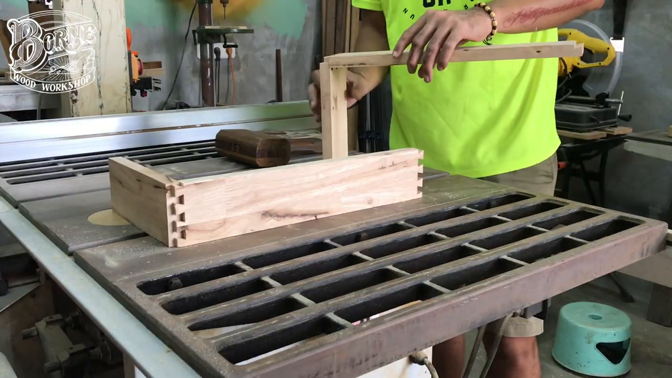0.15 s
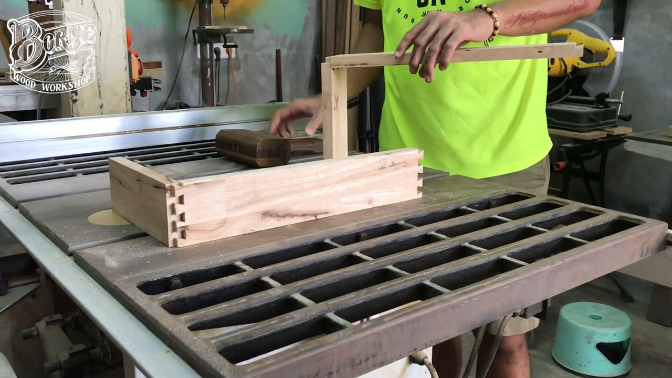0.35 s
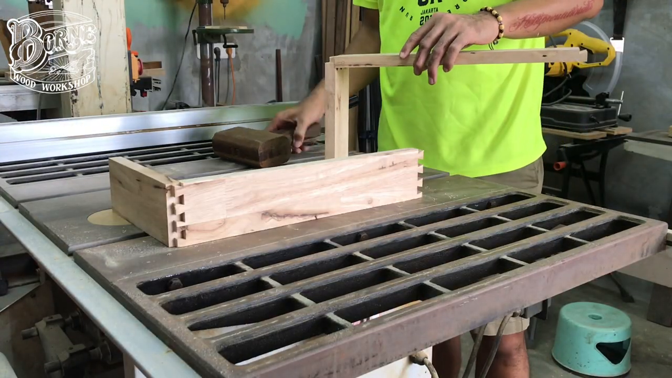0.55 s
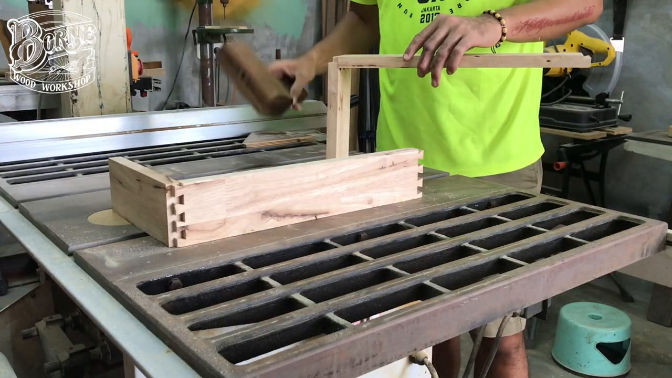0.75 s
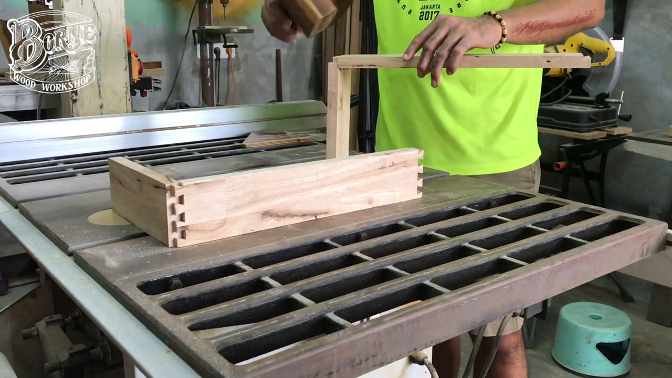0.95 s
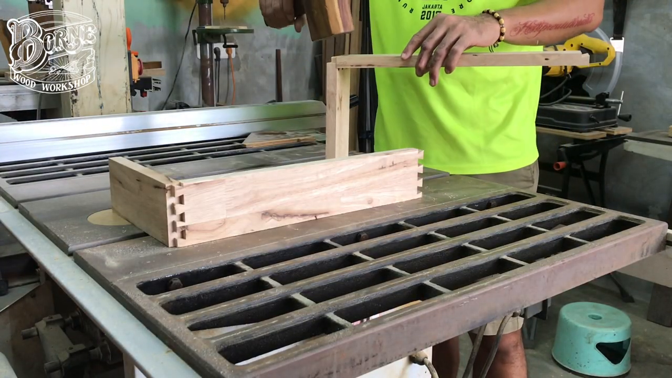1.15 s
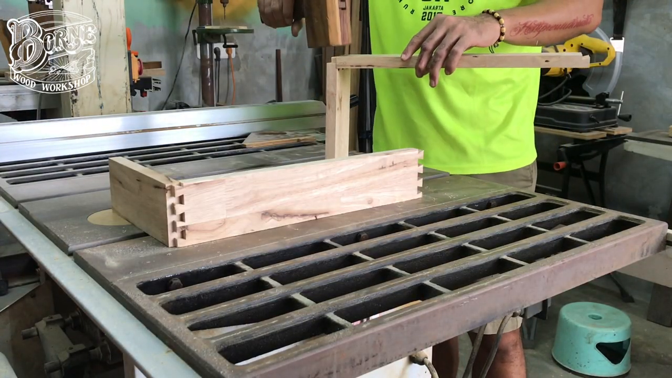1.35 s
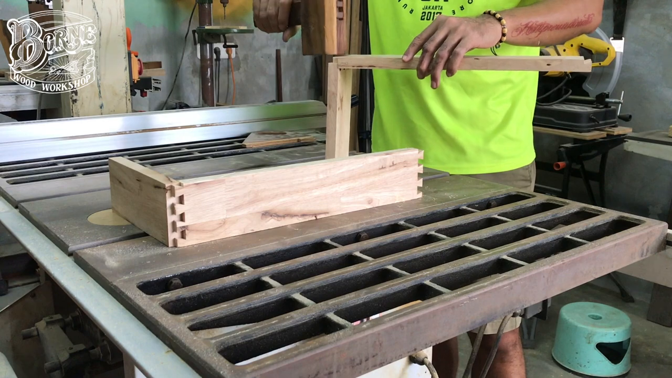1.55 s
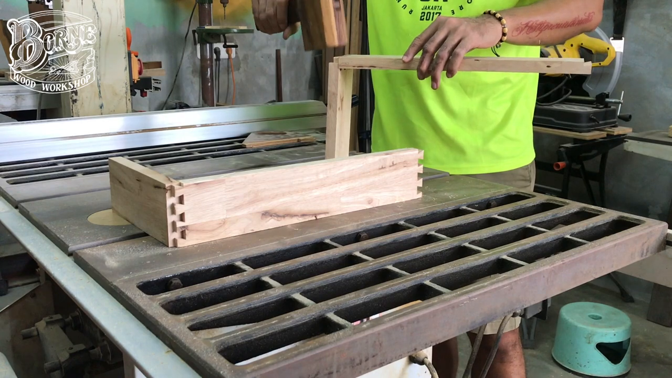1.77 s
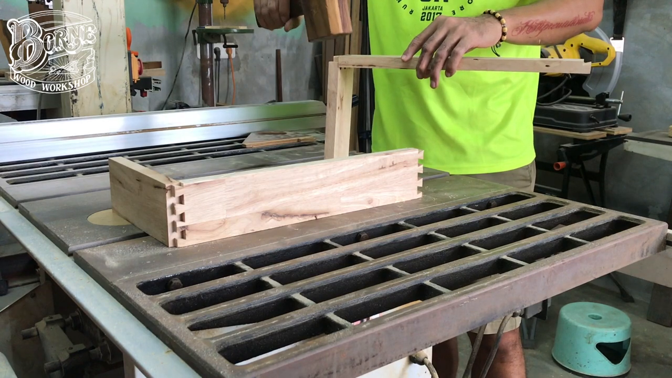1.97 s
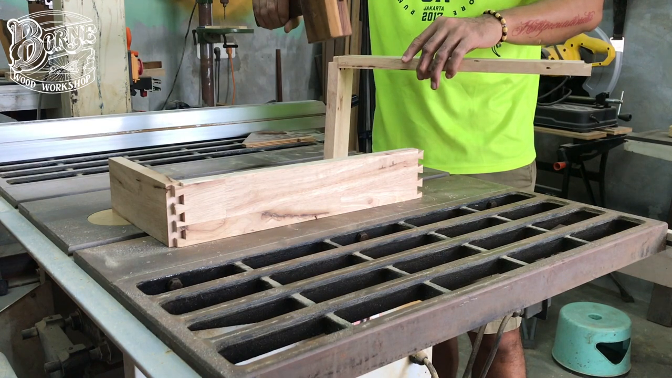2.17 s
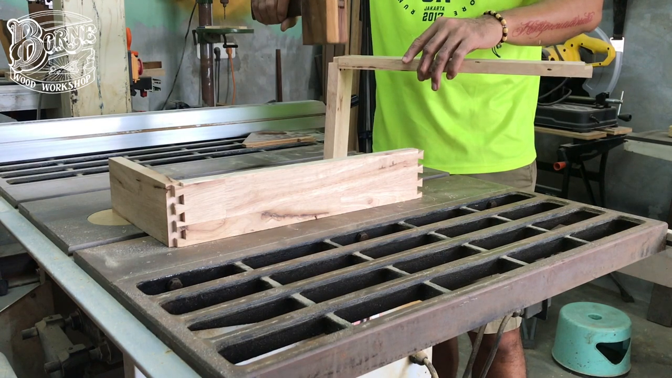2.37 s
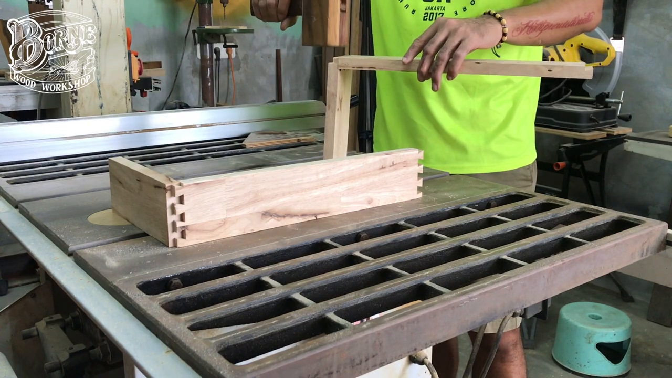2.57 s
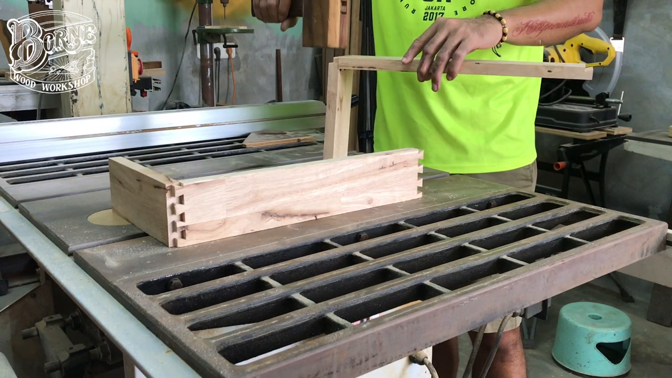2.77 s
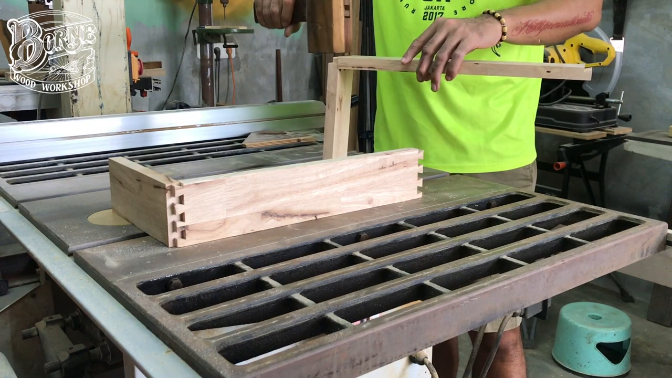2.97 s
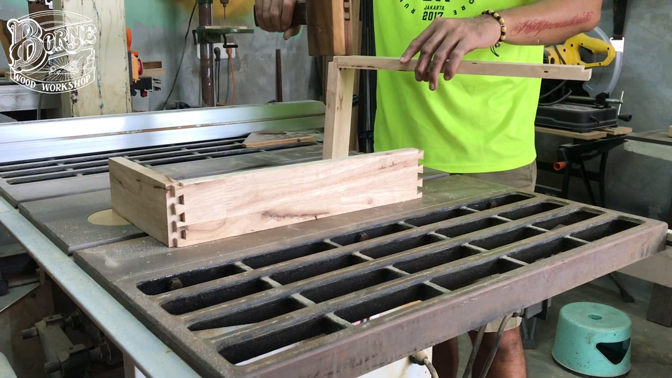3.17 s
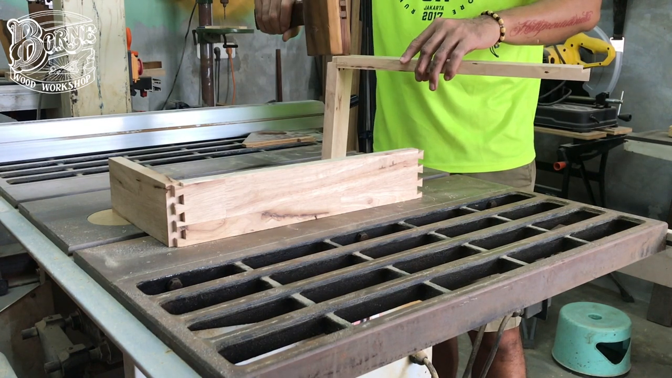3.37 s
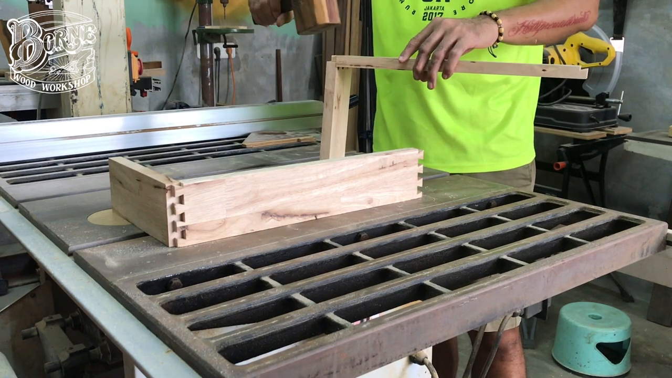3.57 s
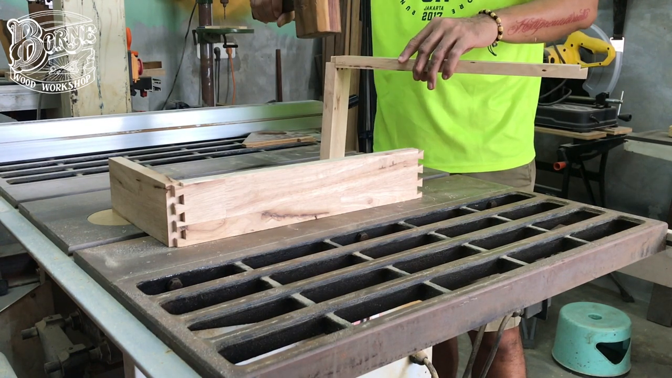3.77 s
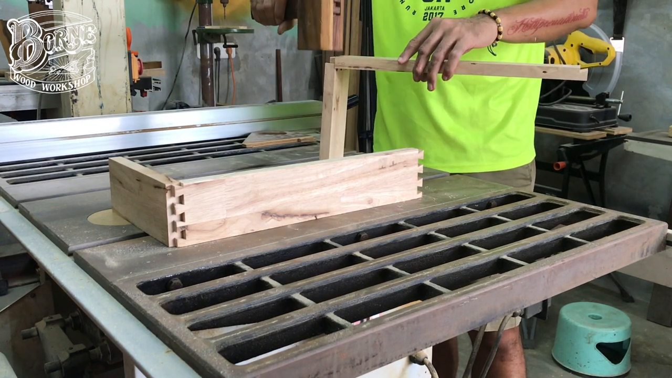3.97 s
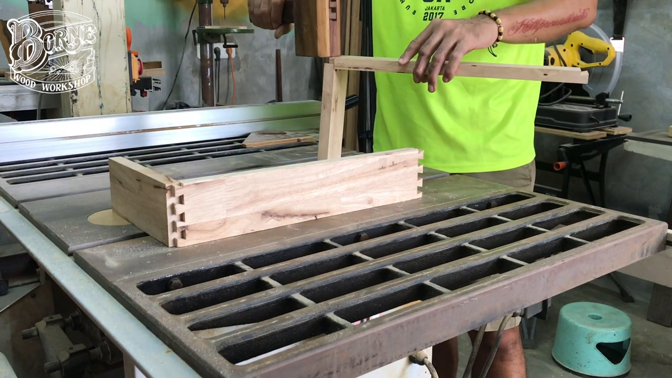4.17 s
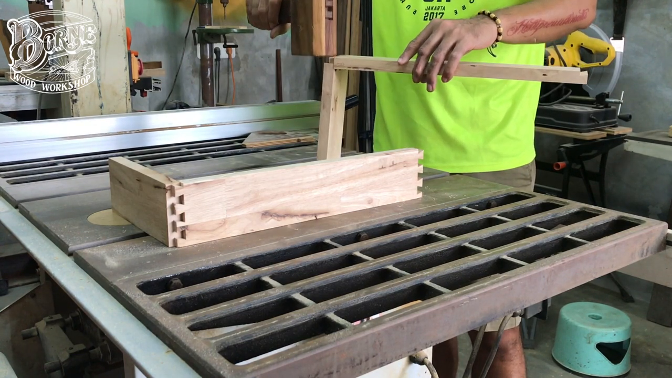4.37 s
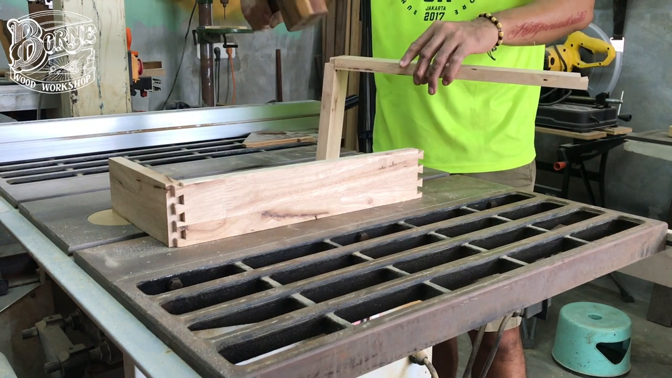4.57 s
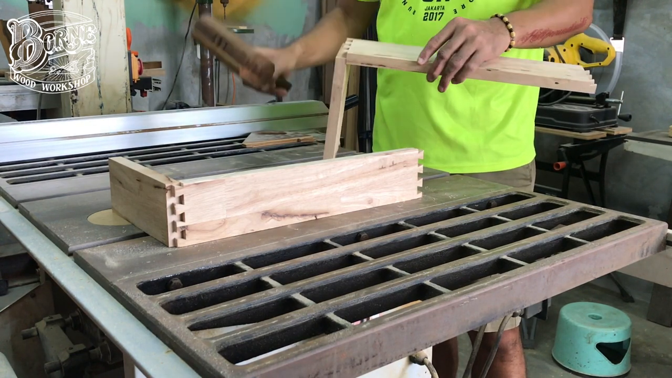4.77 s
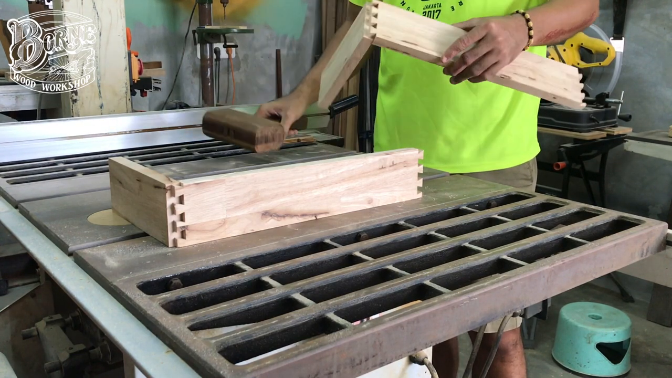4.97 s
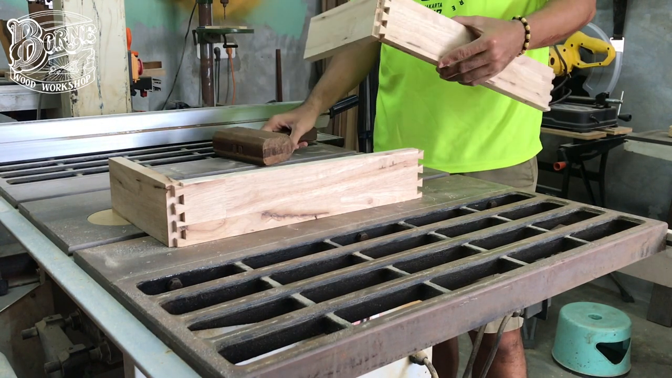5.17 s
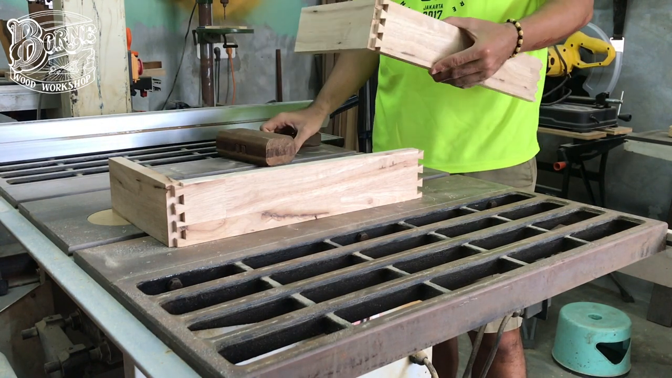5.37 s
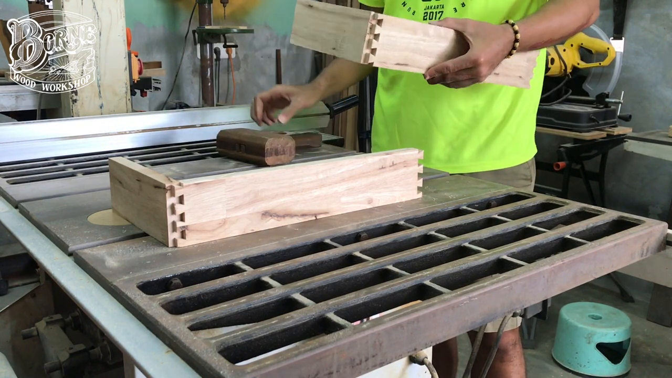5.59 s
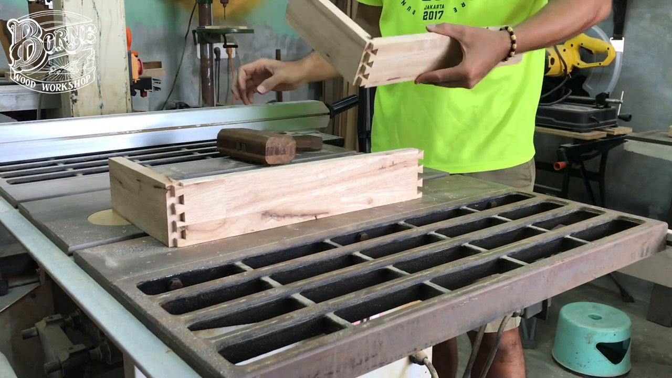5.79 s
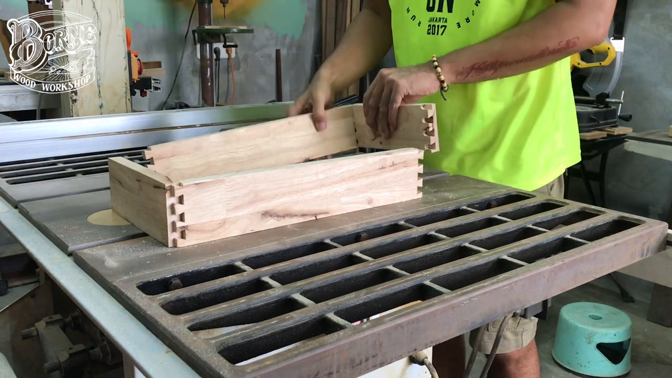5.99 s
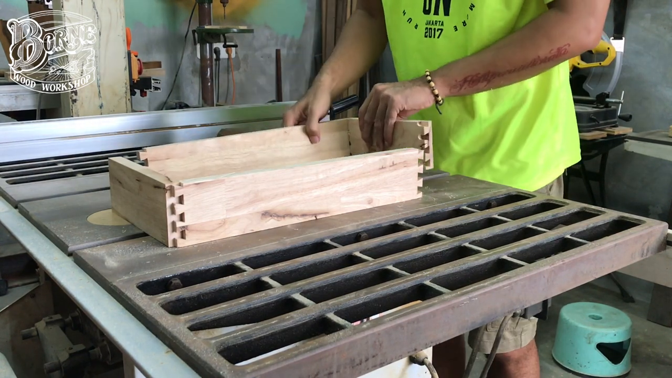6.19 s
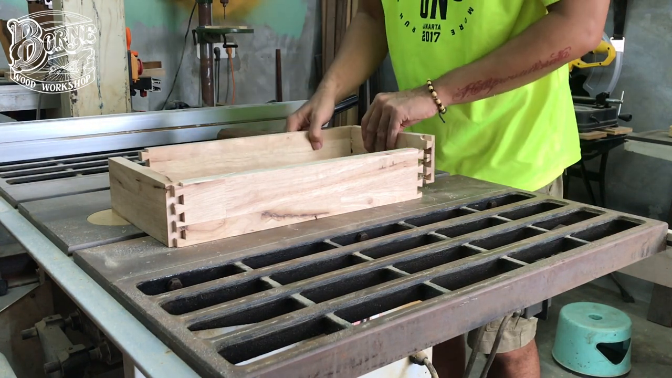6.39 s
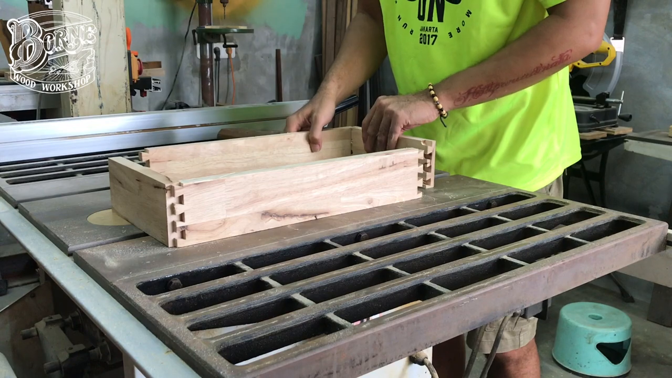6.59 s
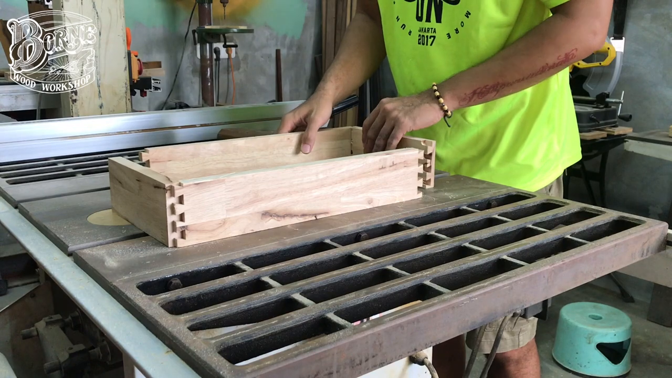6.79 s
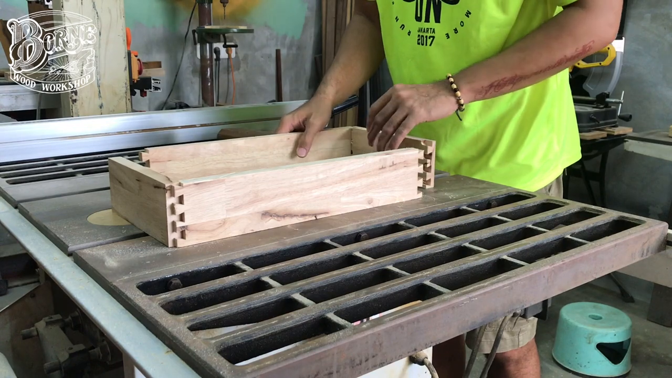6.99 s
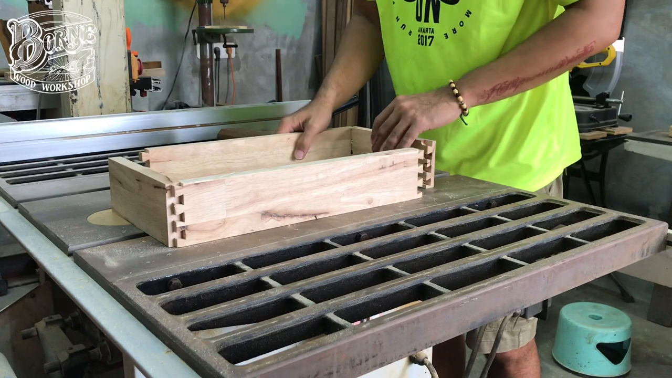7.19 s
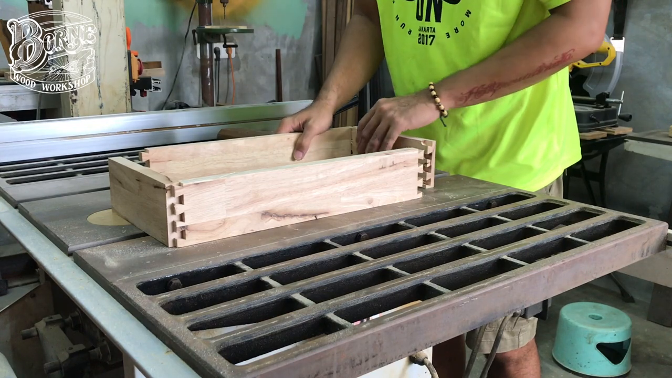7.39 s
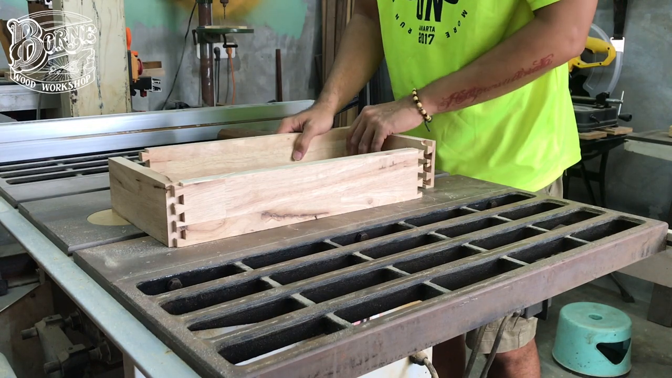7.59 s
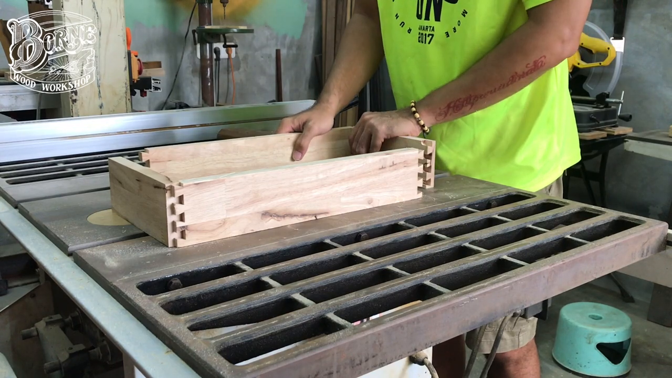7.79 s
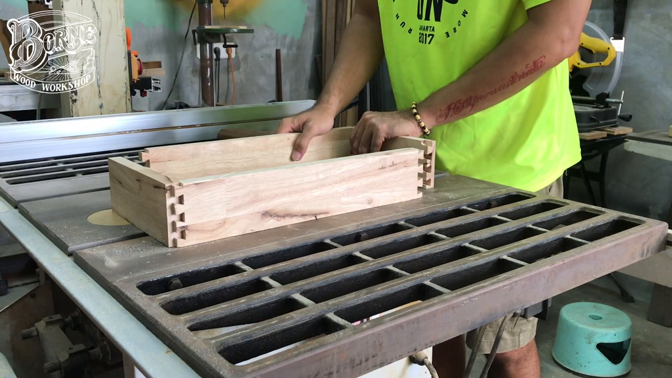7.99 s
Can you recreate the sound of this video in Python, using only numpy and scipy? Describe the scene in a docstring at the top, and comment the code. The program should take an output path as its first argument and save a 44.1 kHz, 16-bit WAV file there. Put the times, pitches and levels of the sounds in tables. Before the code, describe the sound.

Loud, slightly overloaded mallet blows on wood over an iron bench, clattering boards before and after, while a bird chirps faintly beyond the workshop.

```python
"""Rumble, hiss and a bird chirping outside (noisy falling and held tones) open in a hard-walled workshop.
Mallet and boards are set down; a faint tone glides as the mallet is lifted. Thirteen blows then drive a
finger joint home on an iron-topped bench: noise bursts ring wood and iron modes and overload the recorder.
The hiss twice stands higher and stops short. Mallet and boards are laid down or nudged again, brushing noise
among them, while an insect's high whine (narrow noise on a gliding pitch) grows to the end."""
import sys
import numpy as np
from scipy import signal
from scipy.fft import rfft, irfft
from scipy.io import wavfile

SR = 44100
rng = np.random.default_rng(int(sys.argv[2]) if len(sys.argv) > 2 else 0)


def wav_record(signal):
    """Record a signal, one row per channel, as 16-bit PCM in the file named by sys.argv[1]."""
    frames = np.transpose(np.atleast_2d(signal))
    bounded = np.clip(frames, -1, 1)
    # unit amplitude maps onto the largest positive 16-bit level
    quanta = np.round(bounded * 32767).astype(np.int16)
    wavfile.write(sys.argv[1], SR, quanta)


def volts(x):
    """Linear amplitude factor 10**(x/20) for a level x in dB, scalar or array-like."""
    e = np.asarray(x, float) / 20
    return 10 ** e


N = 354740


def rms_one(x):
    """Scale to rms 1."""
    return x / np.sqrt(np.mean(x ** 2) + 1e-20)


def in_time(rows):
    """Columns of a curve, sample by sample."""
    s, *columns = np.transpose(rows)
    return [np.interp(np.arange(N) / SR, s, c) for c in columns]


def at_hz(points, hz):
    """Read a table on a log-frequency axis."""
    table_hz, values = np.transpose(points)
    return np.interp(np.log(hz), np.log(table_hz), values)


def band(x, low_hz, high_hz):
    """Butterworth band-pass."""
    sos = signal.butter(2, [low_hz, min(high_hz, 0.45 * SR)], "band", fs=SR, output="sos")
    return signal.sosfilt(sos, x)


def dying(t60_s, size):
    """Exponential decay, 60 dB down after t60_s."""
    return volts(-60 * np.arange(size) / SR / t60_s)


def coloured(spectrum):
    """Steady noise with the given spectrum, rms 1."""
    hz = np.fft.rfftfreq(N, 1 / SR) + 1
    shape = volts(at_hz(spectrum, hz))
    return rms_one(irfft(rfft(rng.standard_normal(N)) * shape, N))


def add(out, start_s, sound):
    """Mix a sound in at start_s, trimmed to the scene."""
    i = round(start_s * SR)
    sound = sound[max(-i, 0):N - i]
    out[max(i, 0):max(i, 0) + len(sound)] += sound


def wavering(curve, width_hz):
    """Faint tone: low-passed noise pair carried on a gliding pitch."""
    hz, level_db = in_time(curve)
    lowpass = signal.butter(2, width_hz, fs=SR, output="sos")
    slow = rms_one(signal.sosfilt(lowpass, rng.standard_normal((2, N))))
    phase = 2 * np.pi * np.cumsum(hz) / SR
    return volts(level_db) * (slow[0] * np.cos(phase) + slow[1] * np.sin(phase))


def ring(x, hz, t60_s):
    """One mode: two-pole resonance with gain 1 at its peak."""
    r = volts(-60 / (t60_s * SR))
    numerator = [(1 - r * r) / 2, 0, (r * r - 1) / 2]
    denominator = [1, -2 * r * np.cos(2 * np.pi * hz / SR), r * r]
    return signal.lfilter(numerator, denominator, x + 1e-18)


# rumble spectrum: (frequency [Hz], relative level [dB per Hz])
RUMBLE_SPECTRUM = [(21, -10.5), (36, -2), (75, 2.5), (140, 4.5), (184, -3), (332, -2), (404, -7), (492, -8),
                   (667, -9.5), (756, -11.5), (2600, -27.5), (3380, -61), (5720, -120)]
# rumble curve: (time [s], level [dB])
RUMBLE_LEVEL = [(0, -52), (.5, -47.5), (1.3, -50), (3.9, -46), (5.9, -48), (6.4, -51), (8.04, -50.5)]


def rumble():
    """Distant rumble: low coloured noise of slowly moving level."""
    level_db, = in_time(RUMBLE_LEVEL)
    return volts(level_db) * coloured(RUMBLE_SPECTRUM)


# hiss spectrum: (frequency [Hz], relative level [dB per Hz])
HISS_SPECTRUM = [(700, -11.5), (1500, -5.5), (2600, 4), (4700, -1), (6500, -5), (9500, -5.5), (10500, -12),
                 (11500, -5.5), (14000, -5.5), (16000, -18)]
# spells of louder hiss: (end time [s], level [dB])
HISS_LIFTS = [(3.86, -58.5), (4.882, -58.5)]


def hiss(steady_db=-65.5, lift_s=0.41):
    """Steady coloured noise plus spells of band-passed noise with abrupt ends."""
    t = np.arange(N) / SR
    lift = sum(volts(db) * (t > end_s - lift_s) * (t < end_s) for end_s, db in HISS_LIFTS)
    lifted = lift * rms_one(band(rng.standard_normal(N), 1500, 16000))
    return volts(steady_db) * coloured(HISS_SPECTRUM) + lifted


# rustles: (middle time [s], length [s], level [dB])
RUSTLES = [(.13, .16, -51.5), (0.604, .3, -56.5), (6.075, .2, -58), (6.21, .25, -57)]
# rustle spectrum: (frequency [Hz], relative level [dB per Hz])
RUSTLE_SPECTRUM = [(300, -8), (1500, 1.5), (5000, -2.5), (10000, -11.5), (16000, -16)]


def rustles():
    """Hands, clothes and boards brushing: coloured noise swelling and fading."""
    t, envelope = np.arange(N) / SR, 0
    for middle_s, length_s, level_db in RUSTLES:
        u = np.clip((t - middle_s) / length_s, -0.5, 0.5)
        envelope = envelope + volts(level_db) * np.cos(np.pi * u) ** 2
    return envelope * coloured(RUSTLE_SPECTRUM)


# insect whine: (time [s], pitch [Hz], level [dB])
WHINE = [(4.8, 13140, -93), (5.3, 13210, -87), (6.3, 13460, -81), (8.04, 13420, -78.5)]


def insect():
    """High whine, its pitch blurred by noise modulation."""
    return wavering(WHINE, width_hz=150)


# tone as the mallet is lifted: (time [s], pitch [Hz], level [dB])
LIFT_TONE = [(.98, 755, -100), (1.06, 749, -58), (1.25, 737.5, -62), (1.36, 722, -100)]


def lift_tone():
    """Faint falling tone, its pitch blurred by noise modulation."""
    return wavering(LIFT_TONE, width_hz=14)


# bird chirps: (start time [s], level [dB], length [s])
CHIRPS = [(-.12, -44.5, .13), (0.508, -46.5, 0.15), (1.163, -49.5, 0.23), (2.5, -46, 0.089),
          (3.945, -59, 0.13), (4.63, -47.5, 0.17), (5.288, -46.5, 0.11), (6.262, -46.5, 0.13),
          (6.885, -45, 0.11), (7.526, -46.5, 0.15)]


def bird(held_db=-2, upper_db=-17, sag_hz=200, yard_t60_s=0.6):
    """Chirps of a hoarse falling voice and two nearly held ones, smeared by echoes outside."""
    top_hz, bottom_hz, held_hz = 5100, 3060, 5036
    out = np.zeros(N + SR)
    for start_s, level_db, length_s in CHIRPS:
        u = np.linspace(0, 1, int(length_s * SR))
        falling_hz = bottom_hz + (top_hz - bottom_hz) * (1 - u) ** 1.6
        rough = 0.5 * rms_one(band(rng.standard_normal(16384), 60, 600))[:len(u)]
        falling = (1 + rough) * np.sin(2 * np.pi * np.cumsum(falling_hz) / SR)
        held = 0
        for hz, db in [(held_hz, held_db), (held_hz * 1.09, upper_db)]:
            phase = 2 * np.pi * np.cumsum(hz + sag_hz * (0.5 - u)) / SR
            held = held + volts(db) * (1 + 0.5 * rough) * np.sin(phase)
        falling *= np.abs(np.sin(np.pi * u ** 0.7)) ** 2.5
        held *= np.abs(np.sin(np.pi * u ** 0.26))
        i = round((start_s + 1) * SR)  # 1 s of run-in
        out[i:i + len(u)] += volts(level_db) * (falling + held)
    echoes = rng.standard_normal(SR) * dying(yard_t60_s, SR)
    return signal.fftconvolve(out, echoes / np.sqrt(np.sum(echoes ** 2)))[SR:SR + N]


# room decay: (frequency [Hz], t60 [s])
SHOP_T60 = [(60, 0.47), (160, 0.92), (420, 0.6), (1100, 0.34), (2900, 0.49), (7700, .38), (15000, 0.26)]
# reflection colour: (frequency [Hz], relative level [dB])
SHOP_COLOUR = [(200, 3), (1200, 3.5), (1800, 3), (4000, -0.5), (9000, -4), (15000, 0.5)]


def shop(x, level_db=0.5, buildup_s=0.0013):
    """Dense reflections: half-octave noise bands, each dying at the room's rate."""
    size, edges_hz = int(1.2 * SR), 45 * 2 ** np.arange(0, 9, 0.5)
    white, tail = rng.standard_normal((2, size)), np.zeros(size)
    for k, (low, high) in enumerate(zip(edges_hz, edges_hz[1:])):
        mid_hz = np.sqrt(low * high)
        gain = volts(at_hz(SHOP_COLOUR, mid_hz))
        tail += gain * band(white[k % 2], low, high) * dying(at_hz(SHOP_T60, mid_hz), size)
    tail *= 1 - np.exp(-np.arange(size) / SR / buildup_s)
    return volts(level_db) * signal.fftconvolve(x, tail / np.sqrt(np.sum(tail ** 2)))[:N]


# contact bands, thud to crack: (low [Hz], high [Hz], t60 [s], rise [s], chatter per unit impact [ratio])
CONTACT = [(119, 625, 0.026, 0.0021, 0.46), (404, 1040, .025, 0.00085, 0.56),
           (790, 1450, 0.012, 0.001383, 0.64), (1250, 1950, 0.012, 0.00088, 0.7),
           (1900, 5230, 0.019, 0.00045, .4), (4660, 15800, 0.026, 0.0003, .7)]


def contact_burst(levels_db, noise):
    """One clean impact plus gritty chatter as the fibres give; each band has its own rise and length."""
    t, burst = np.arange(4096) / SR, 0
    for (low, high, t60_s, rise_s, grit), level_db, chatter in zip(CONTACT, levels_db, noise):
        shape = dying(t60_s, 4096) * (1 - np.exp(-t / rise_s))
        energy = np.sum(shape ** 2)
        force = grit * chatter * shape / np.sqrt(energy)
        force[int(rise_s * SR)] += 1
        part = band(band(force, low, high), low, high)
        burst = burst + volts(level_db) * part * np.sqrt(energy / np.sum(part ** 2))
    return burst


def contacts(events, contact_db, thud_db, thud_follows):
    """Contact noise of all hits; the thud band's level follows the body band's."""
    out = np.zeros(N)
    white = rng.standard_normal((len(events), len(CONTACT), 4096))
    for (s, level_db, body_db, upper_db, clack_db, crack_db), noise in zip(events, white):
        levels_db = (thud_db + thud_follows * body_db, body_db, 0, upper_db, clack_db, crack_db)
        add(out, s - 0.001, volts(level_db + contact_db) * contact_burst(levels_db, noise))
    return out


def impulses(events):
    """One-sample clicks, stronger for a louder hit and a harder crack."""
    out = np.zeros(N)
    for s, level_db, _, _, _, crack_db in events:
        add(out, s, volts([level_db + 0.25 * (crack_db + 17)]))
    return out


def wood(contact, modes):
    """Contact noise plus the wood modes it excites."""
    return contact + sum(volts(db) * ring(contact, hz, t60_s) for hz, db, t60_s in modes)


# iron bench-top modes: (frequency [Hz], relative level [dB], t60 [s])
IRON = [(689, -36, 2.5), (1520, -36, 7.8), (1792, -6.5, 0.23)]


def iron_top(clicks, iron_db):
    """Bench-top modes; drive scaled so a unit click gives a unit swing."""
    return sum(volts(db + iron_db) * ring(clicks * t60_s * SR / 7, hz, t60_s) for hz, db, t60_s in IRON)


def stand(clicks, shake_db, t60_s=1.3):
    """Shaken stand: low noise under a slowly dying envelope, restarted by each click."""
    shudder = signal.lfilter([1], [1, -volts(-60 / (t60_s * SR))], clicks)
    return volts(shake_db) * shudder * rms_one(band(rng.standard_normal(N), 36, 110))


# mallet and boards laid down or nudged: (time [s], level before contact_db [dB],
# body, upper knock, clack, crack [dB re the 790-1450 Hz band])
TOUCHES = [(0.2285, -6.5, -11.5, 1, -10, -17.5), (0.6123, -38, 6.5, 3.5, -18, -22.5),
           (5.1592, -10, -11, -0.5, -23, -42), (5.258, -25.5, -1.5, -6, -24, -37),
           (5.45, -25, -3.5, -4.5, -21.5, -42), (5.898, -47, 7.5, 0, -11, -18),
           (6.0795, -35.5, 9, 8.5, -5, -13.5), (6.1203, -48, 6, -9, -20, -19),
           (6.5273, -47.5, 12, -5, -11, -32.5), (6.6158, -60, 13, -7.5, -14, -23)]
# loose boards and mallet head: (frequency [Hz], level over contact noise [dB], t60 [s])
LOOSE = [(266.4, 5.5, 0.42), (312.8, 19, 0.46), (440, 11, 0.09), (663, 2.5, 0.044), (740, 6, 0.013),
         (1000, 1, .04), (1188, 7, 0.015), (2870, 8, 0.005)]


def touches():
    """Contacts ringing loose wood; also the iron top and stand they excite."""
    contact = contacts(TOUCHES, contact_db=-4.67, thud_db=1.5, thud_follows=1.51)
    clicks = impulses(TOUCHES)
    return wood(contact, LOOSE), iron_top(clicks, iron_db=-25.5) + stand(clicks, shake_db=-39)


# mallet blows: (time [s], level before contact_db [dB],
# body, upper knock, clack, crack [dB re the 790-1450 Hz band])
BLOWS = [(1.3538, -9, -13.5, 4, -9, -28), (1.6481, -8.5, -12, -1, -19, -29),
         (1.8929, -7.5, -8.5, -1.5, -12, -30), (2.1214, -4, -11, -3.5, -12.5, -17),
         (2.3487, -4, -10, -3, -15.5, -24), (2.5687, -5.5, -9.5, -2, -14.5, -23),
         (2.7956, -5.5, -10.5, -0.5, -11.5, -16), (3.021, -4.5, -10.5, -0.5, -9.5, -13),
         (3.24, -2.5, -13.5, -3, -11, -16), (3.4525, -3, -10, 2, -14.5, -27.5),
         (3.9865, -8, -7.5, 1.5, -7.5, -18.5), (4.2319, -5, -11.5, -1, -9.5, -19.5),
         (4.4686, -2.5, -10.5, -6, -8.5, -10.5)]
# struck joint with the bench under it: (frequency [Hz], level over contact noise [dB], t60 [s])
JOINT = [(121, 12.5, 0.21), (259.7, 10.5, 0.17), (299, 16.5, 0.16), (381, 0, 0.066), (456, 1.5, 0.49),
         (626, 4.5, .08), (683.4, 6.5, .15), (755, 5, 0.32), (857, 0, 0.54), (956, 2, 0.2),
         (1132, 4.5, 0.072), (1290, 1, 0.015), (1603, -0.5, 0.059), (1740, 6.5, 0.17), (1789, 9, 0.18),
         (2780, 6, 0.013), (3730, 1.5, 0.095), (8524, 2.5, 0.0042)]


def blows():
    """Crack and knock ringing the joint; also the iron top and stand they excite."""
    contact = contacts(BLOWS, contact_db=4.5, thud_db=-15, thud_follows=0.2)
    clicks = impulses(BLOWS)
    return wood(contact, JOINT), iron_top(clicks, iron_db=-21) + stand(clicks, shake_db=-35)


def scene():
    """Hits direct and through the room, over the background."""
    background = rumble() + hiss() + rustles() + insect() + lift_tone() + bird()
    tap, bench_soft = touches()
    knock, bench = blows()
    hits = tap + knock
    return (background + hits + shop(hits) + bench_soft + bench)[None]


def roll_off(x):
    """The treble ends steeply here."""
    return signal.sosfilt(signal.butter(12, 16510, fs=SR, output="sos"), x)


def record(dry):
    """The microphone drops the deepest bass; the loudest peaks overload."""
    knee = 5.0  # exponent: higher clips harder
    high_pass = signal.butter(6, 38, "high", fs=SR, output="sos")
    dry = signal.sosfilt(high_pass, dry)
    mix = dry / (1 + np.abs(dry) ** knee) ** (1 / knee)
    return roll_off(mix)


dry = scene()
out = record(dry)
wav_record(out)
```